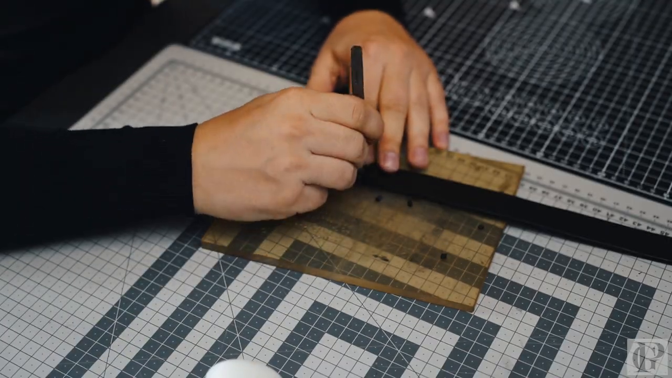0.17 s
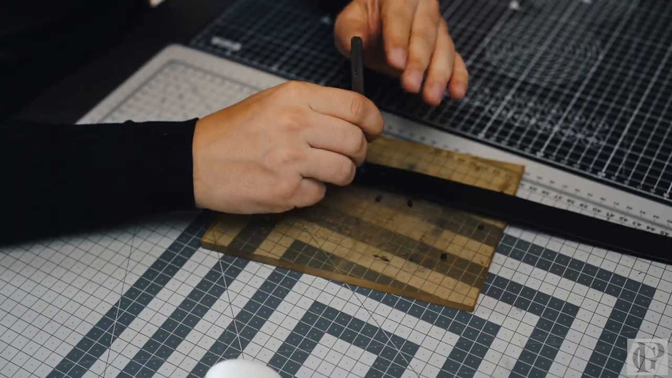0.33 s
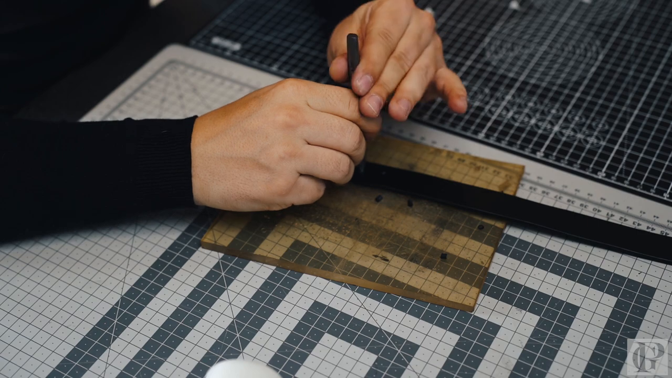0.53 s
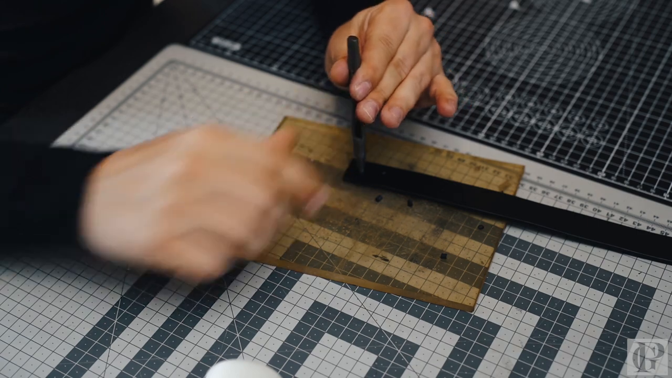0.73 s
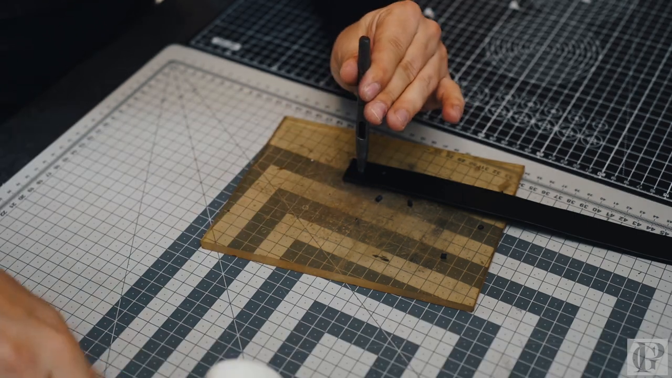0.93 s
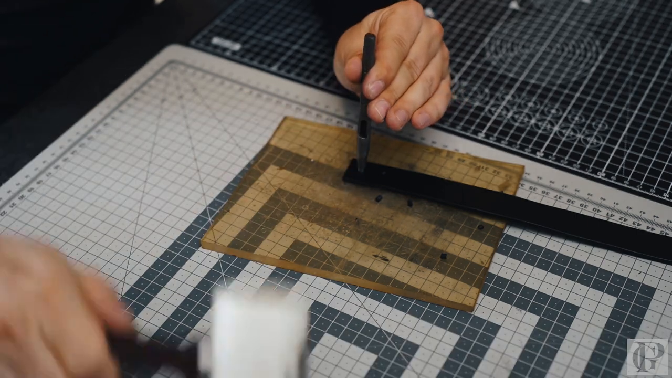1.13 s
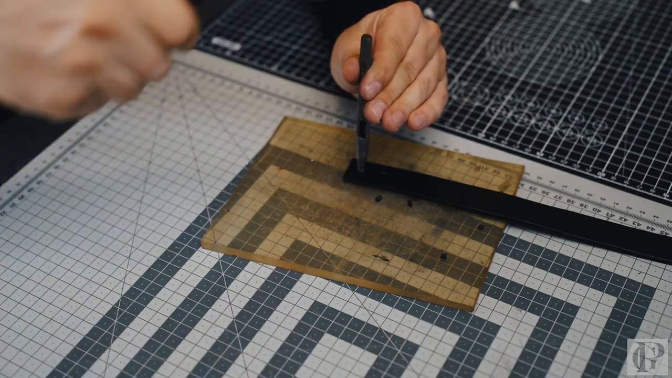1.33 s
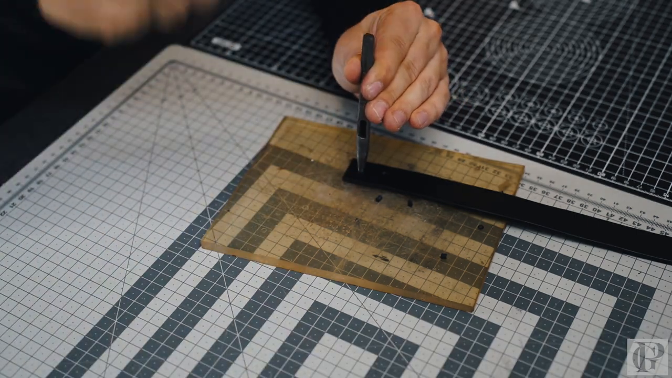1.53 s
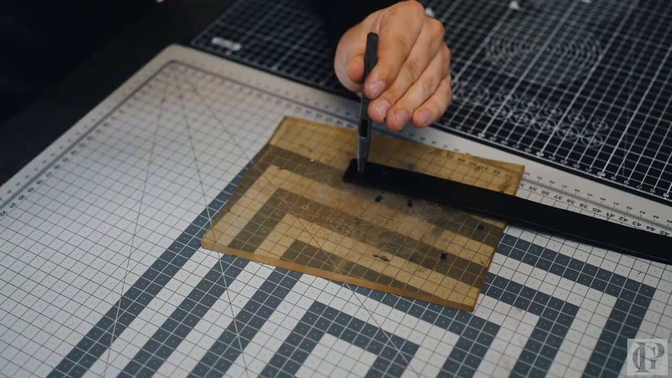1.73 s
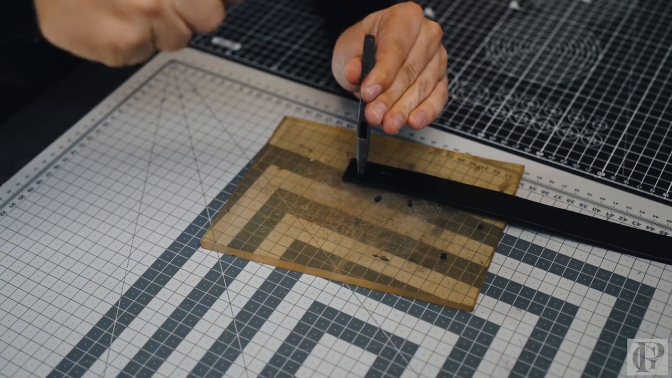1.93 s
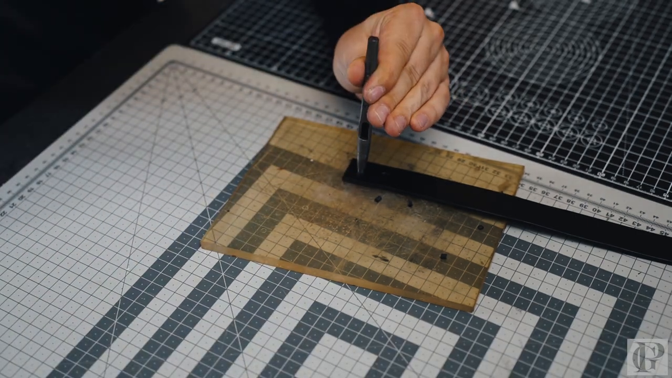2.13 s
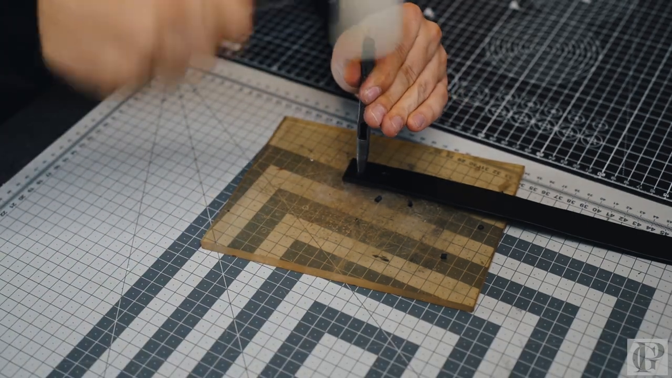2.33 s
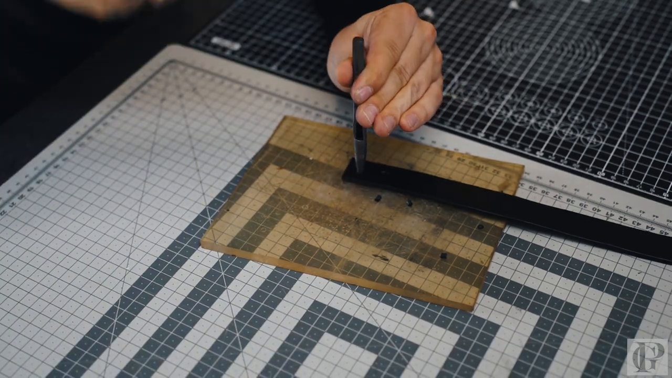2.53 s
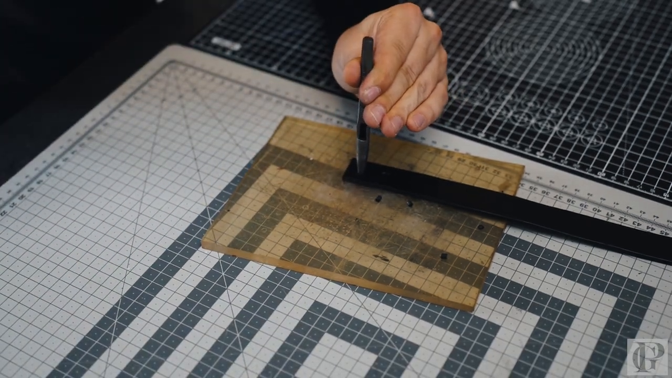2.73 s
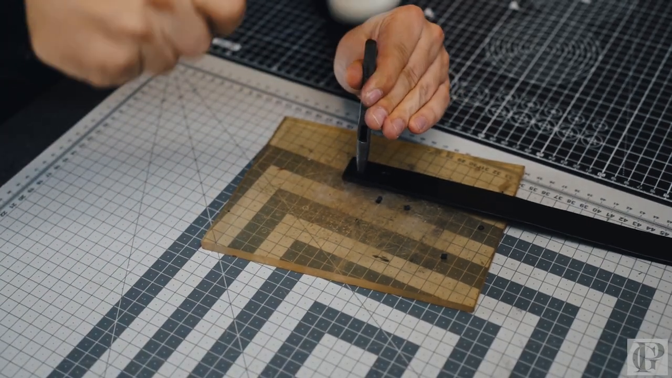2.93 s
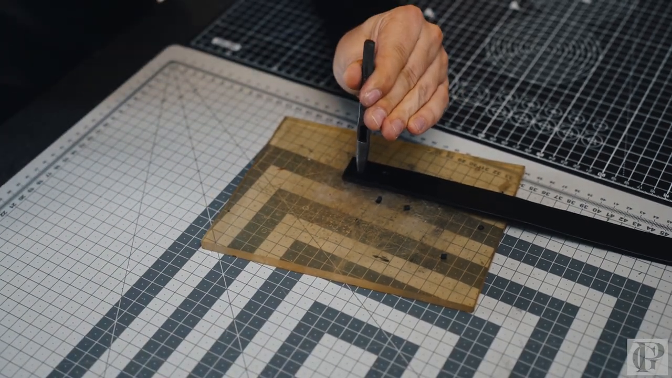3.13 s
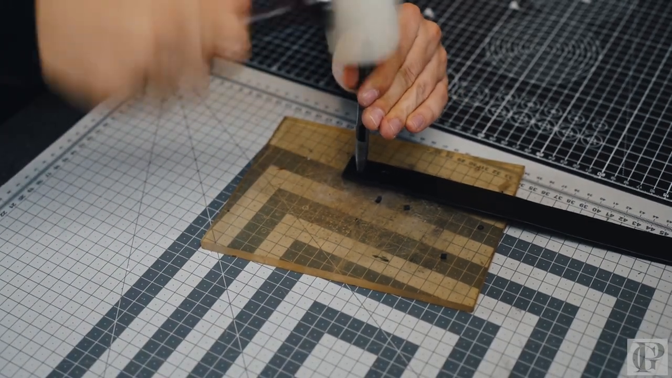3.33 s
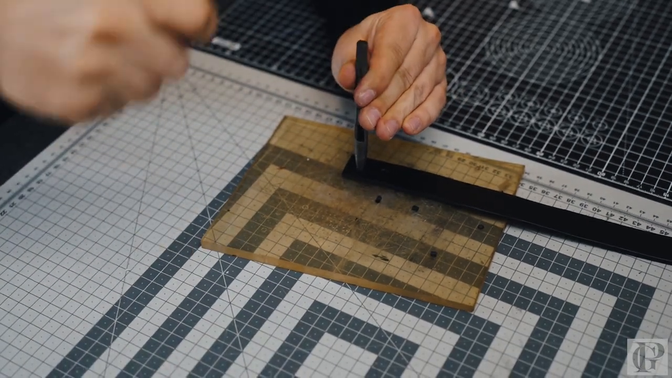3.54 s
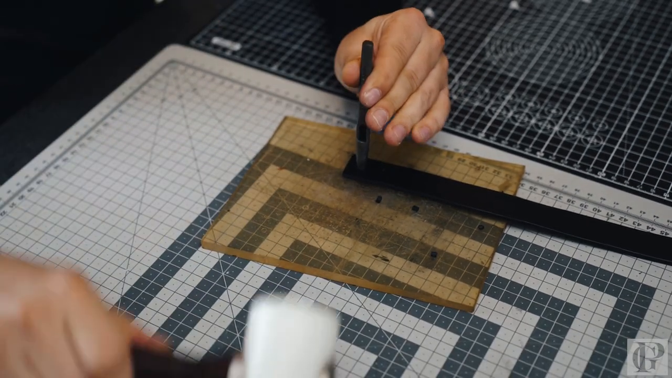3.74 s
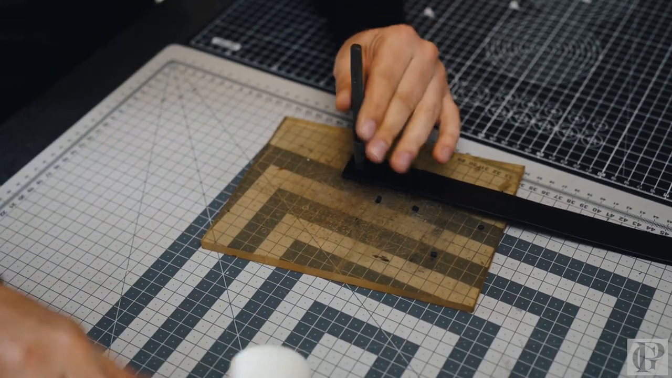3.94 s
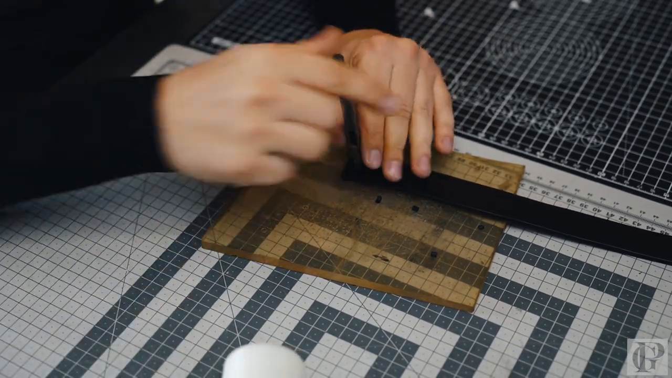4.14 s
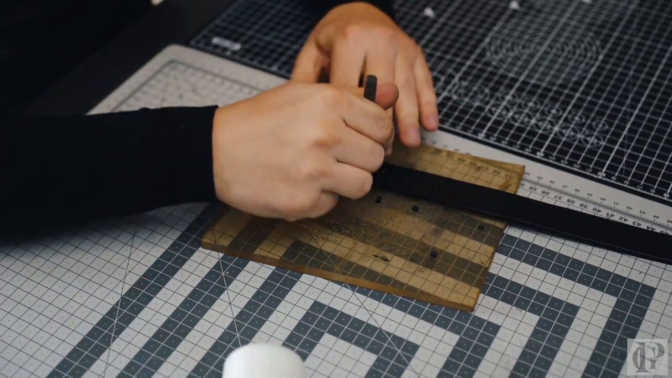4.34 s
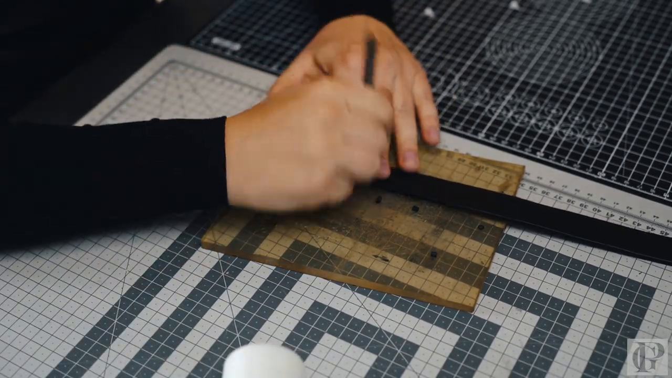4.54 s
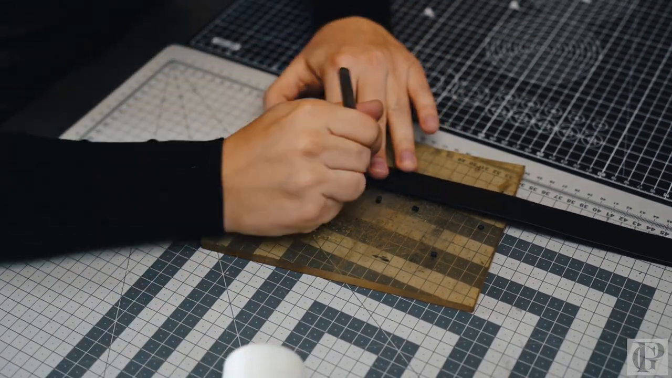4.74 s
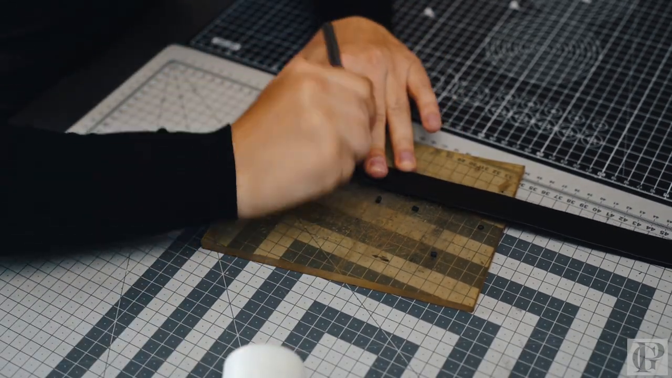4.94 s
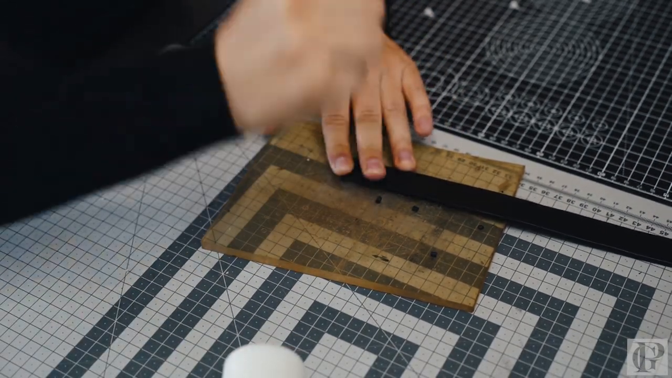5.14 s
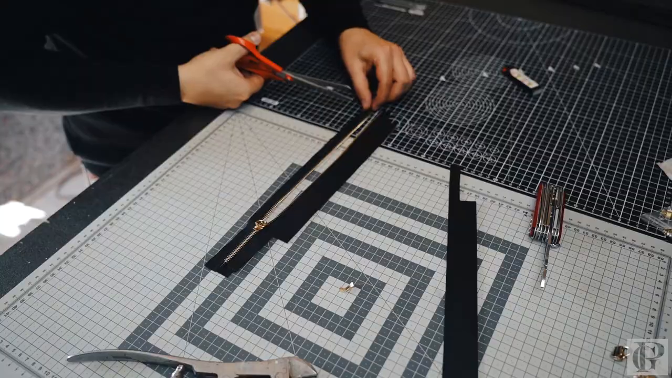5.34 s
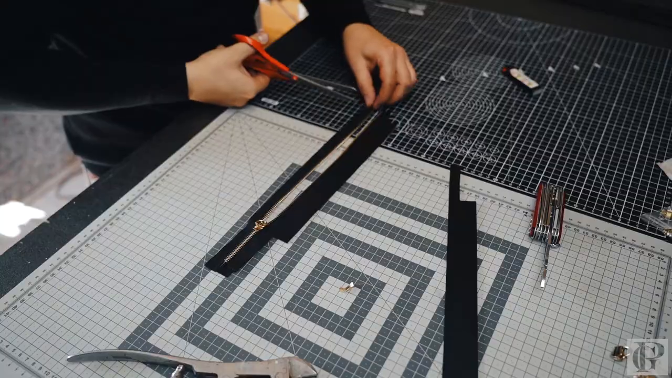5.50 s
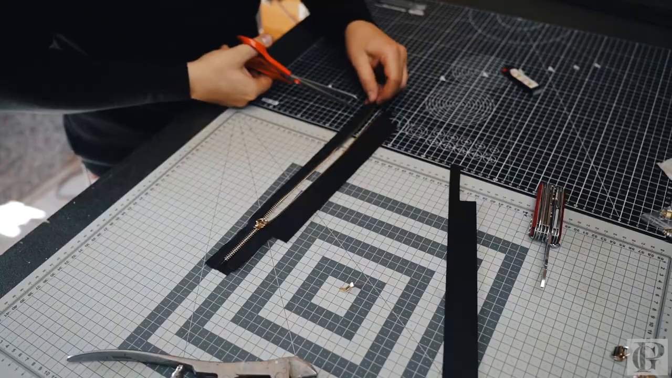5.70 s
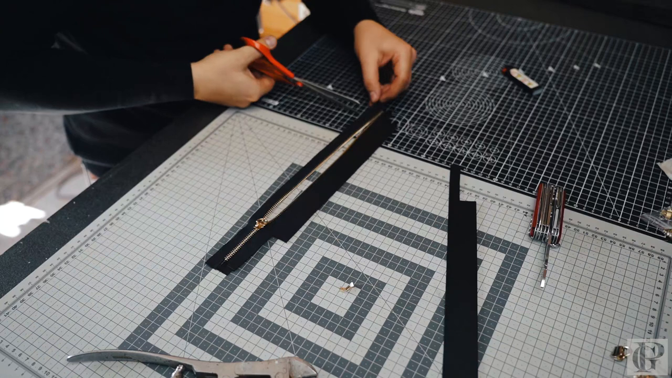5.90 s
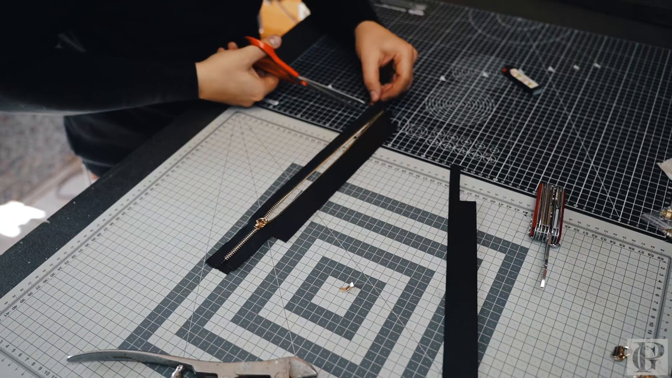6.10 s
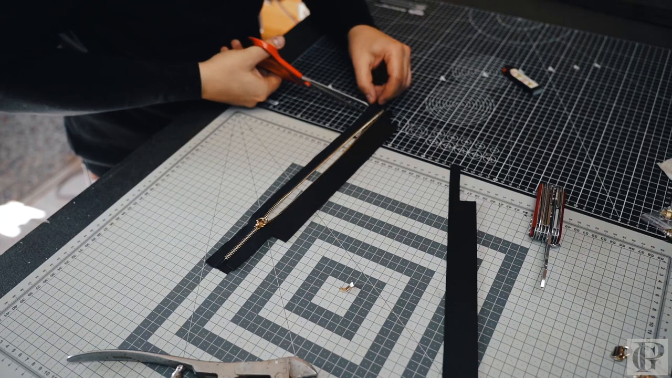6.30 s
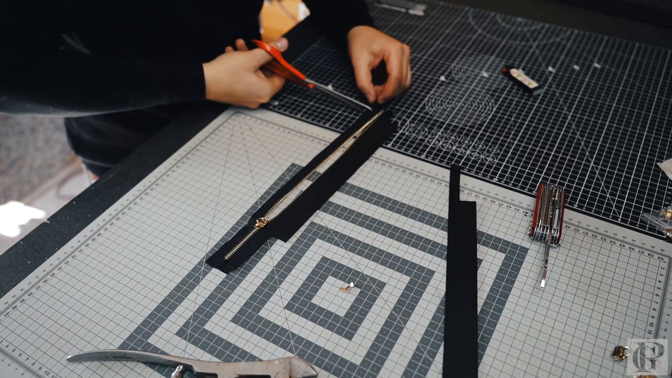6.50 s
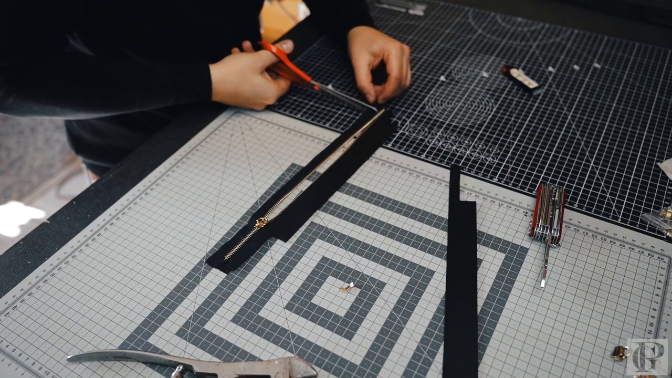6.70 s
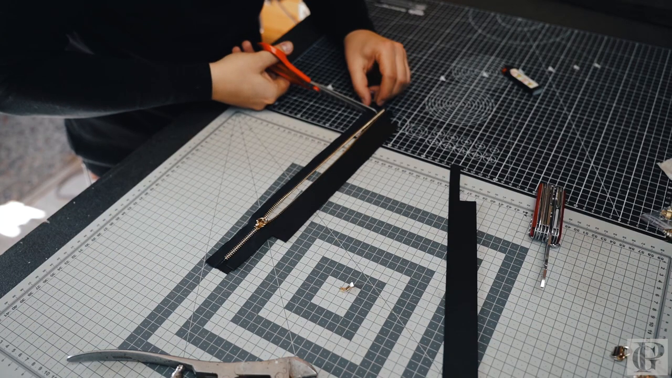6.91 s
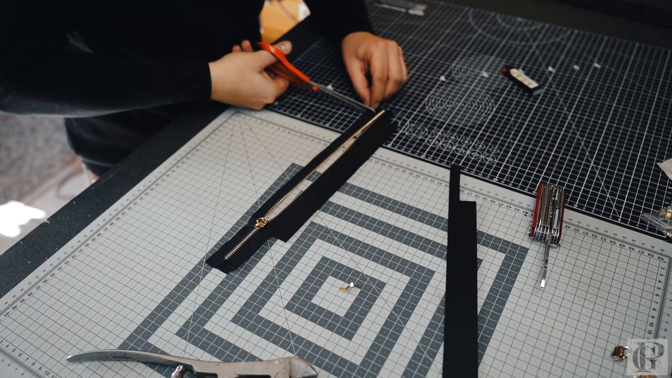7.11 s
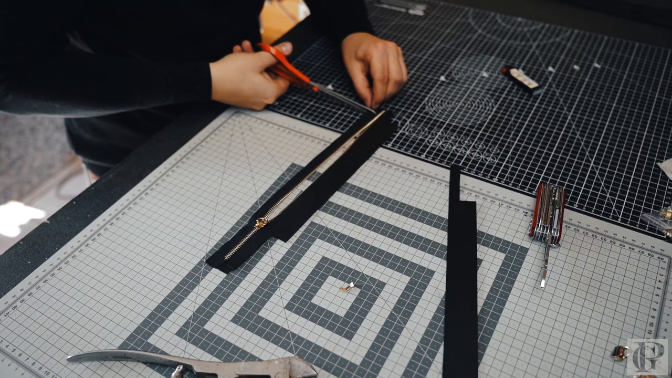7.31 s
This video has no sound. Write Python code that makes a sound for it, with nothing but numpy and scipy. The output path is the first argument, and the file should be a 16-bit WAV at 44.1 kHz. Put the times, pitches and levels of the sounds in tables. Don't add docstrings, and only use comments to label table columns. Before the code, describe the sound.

In a bare, hard-walled room with low ventilation hum, fingers and tools tick and rustle on a table. A plastic mallet hits a steel punch through leather into a board four times, half a second apart, each crack squashed so the room echo swells. The mallet clatters onto the mat, light handling follows, then an abrupt cut to a quieter hum with small scissor ticks.

```python
import sys
import numpy as np
from scipy import signal
from scipy.fft import rfft, irfft
from scipy.io import wavfile
from scipy.ndimage import uniform_filter1d, minimum_filter1d

SR = 44100
rng = np.random.default_rng(int(sys.argv[2]) if len(sys.argv) > 2 else 0)


def how_loud(loudness_db):
    steps = np.asarray(loudness_db, float) / 20
    return 10 ** steps


def store_pcm(level_fs):
    pcm = np.round(np.clip(level_fs, -1, 1) * 32767).astype(np.int16)
    wavfile.write(sys.argv[1], SR, np.atleast_2d(pcm).T)


N = 324540
CHANGE_S = 5.374

# f/Hz, level/dB, T60/s
TABLE_MODES = [(39, -24.5, 1), (60, -24, 0.39), (86, -8.5, 0.27), (114.8, -12, .3), (154.7, -1, .35),
               (178.9, -4.5, 0.19), (251, -5.5, 0.36), (389, -6, 0.37), (415.4, -0.5, .15)]
# f/Hz, density/dB per Hz
MAT_COLOUR = [(59, -46), (100, -10.5), (156, -11.5), (481, -3), (547, -1), (991, 2), (1200, 1.5),
              (1650, -2), (3940, -20.5), (10700, -36.5), (16000, -50.5)]


def read(points, hz):
    f, value = np.transpose(points)
    return np.interp(np.log(hz + 1), np.log(f + 1), value)


def evened(x):
    return x / np.sqrt(np.mean(x ** 2) + 1e-20)


def add(mix, s, sound):
    part = mix[round(s * SR):][:len(sound)]
    part += sound[:len(part)]


def paired(a, b, same):
    same = np.clip(same, -1, 1)[:, None]
    return np.array([a, same * a + np.sqrt(1 - same ** 2) * b])


def noise(gain, same_points, hop=256):
    frames = N // hop + 5
    hz = np.fft.rfftfreq(4 * hop, 1 / SR)
    a, b, c, d = rng.standard_normal((frames, len(hz), 4)).T
    z = paired(a + 1j * b, c + 1j * d, read(same_points, hz))
    z = z * gain(hz[:, None], np.arange(frames) * hop / SR)
    return signal.istft(z, nperseg=4 * hop, noverlap=3 * hop)[1][:, :N]


def ring(modes, tilt_db=0., detune=0., rise=.8, centre_hz=1000):
    hz, db, t60 = np.transpose(modes)[:, :, None]
    hz = hz * (1 + detune * rng.standard_normal(hz.shape))
    t = np.arange(int(np.max(t60) * SR) + 2) / SR
    side = (-1.) ** np.arange(len(hz))[:, None]
    decay = how_loud(db + tilt_db * np.log2(hz / centre_hz) - 60 * t / t60)
    build = 1 - np.exp(-t * hz / rise)
    return (side * decay * build * np.sin(2 * np.pi * hz * t)).sum(0)


def pulse(points, tilt_db):
    hz = abs(np.fft.fftfreq(4096, 1 / SR))
    db = read(points, hz) + tilt_db * np.log2((hz + 50) / 1000)
    log_gain = np.log(how_loud(np.maximum(db, -100)))
    click = np.fft.ifft(np.exp(np.conj(signal.hilbert(log_gain)))).real[:2048]
    return click / np.linalg.norm(click)


def scattered(click):
    longest_s = .0055
    wander = evened(uniform_filter1d(rng.standard_normal(2049), size=24))
    delay = longest_s * (.5 + .5 * np.tanh(wander))
    phase = -2j * np.pi * np.cumsum(delay) * SR / 4096
    return irfft(rfft(click, 4096) * np.exp(phase), 4096)


def room(x):
    # f/Hz, T60/s
    room_t60 = [(40, 0.52), (110, 0.24), (280, 0.36), (740, 0.46), (1940, .5), (5120, 0.46), (9000, 0.36),
                (15000, 0.24)]
    # f/Hz, likeness
    room_same = [(120, 1), (250, .985), (500, .8), (1000, .64), (2000, .45), (4000, .05), (16000, .05)]
    # f/Hz, share
    room_late = [(200, .45), (800, 0.52), (2200, .6), (5000, 0.8), (14000, 0.52)]
    taps = np.zeros((2, SR))
    at = np.arange(120, SR - 16, 16) + rng.integers(0, 16, (2, (SR - 121) // 16))
    np.put_along_axis(taps, at, rng.choice([-1., 1.], at.shape), 1)
    hz, t, z = signal.stft(taps, SR, nperseg=256)
    z = paired(*z, read(room_same, hz)) * how_loud(-60 * t / read(room_t60, hz)[:, None])
    z *= 1 - np.clip(read(room_late, hz), 0, .95)[:, None] / (1 + (t / 0.036) ** 4)
    tail = signal.istft(z, SR, nperseg=256)[1]
    tail[:, :100] = 0
    return signal.fftconvolve(x[None], tail / np.linalg.norm(tail[0]), axes=1)[:, :N]


def hum():
    # t/s, level/dB
    hum_level = [(0, -50), (0.552, -47.5), (1.011, -48), (1.85, -48), (4.399, -55.5), (5.0, -51),
                 (5.361, -50), (5.386, -62), (6.301, -59.5), (6.4, -58.5), (6.65, -59.5), (7.099, -61),
                 (7.36, -59)]
    # f/Hz, density/dB per Hz
    hum_near = [(15, -48.5), (25, -10.5), (48, -21.5), (102, 6), (139, -14.5), (171, -0.5), (215, -23),
                (264, 1.5), (318, 4), (522, -13.5), (790, -8.5), (1050, -14.5), (1190, -16.5), (1700, -24),
                (3500, -41), (4550, -82.5), (7700, -120)]
    # f/Hz, density/dB per Hz
    hum_far = [(25, -14), (50, -11.5), (80, -13), (135, -2.5), (190, -10), (250, 2), (310, -2), (400, -3),
               (600, -14.5), (800, -15), (1100, -21.5), (1400, -23), (2000, -31), (3500, -56)]
    # f/Hz, likeness
    hum_same = [(60, 1), (240, 0.93), (950, 0.78), (3770, 0.0058), (15000, 0.03)]
    # f/Hz, density/dB per Hz
    hiss_colour = [(1180, -32.5), (2000, 3.5), (4970, 1), (7010, -4), (7720, -0.5), (11500, -1),
                   (12500, -27), (16500, -20)]
    s, db = np.transpose(hum_level)

    def rumble(hz, t):
        patches = rng.standard_normal((len(t), len(hz))).T
        patches = evened(uniform_filter1d(uniform_filter1d(patches, 4, 0), 8, 1))
        colour = np.where(t < CHANGE_S, read(hum_near, hz), read(hum_far, hz))
        colour = how_loud(colour - 80 * (hz > 3600))
        return colour / np.sqrt((colour ** 2).sum(0)) * how_loud(np.interp(t, s, db) + 1.3 * patches)

    def hiss_gain(hz, t):
        return how_loud(read(hiss_colour, hz) - 60 * (hz < 1800)) + 0 * t

    low = noise(rumble, hum_same, hop=512) * how_loud(-7.0) * how_loud([[-1.01], [1.01]])
    hiss = evened(noise(hiss_gain, [(100, .3), (16000, .2)]))
    return low + how_loud(-82.5) * hiss


def rustles(near, far, after_change):
    # start/s, end/s, level/dB, centre f/Hz
    slides = [
        (0.272, 0.514, -78, 6000),
        (0.678, 0.753, -76, 4200),
        (0.981, 1.07, -67.5, 3500),
        (4.947, 4.985, -70, 5000),
        (5.715, 5.88, -83, 7300),
        (6.775, 6.827, -85.5, 5000),
    ]
    for start, end, db, hz in slides:
        if (start > CHANGE_S) == after_change:
            count = int((end - start) * SR)
            slips = rng.random(count) < 400 / SR
            slips = slips * how_loud(3.9 * np.minimum(rng.exponential(1, count), 3))
            band = signal.butter(1, [hz * 0.15, min(hz * 1.4, SR / 2.2)], "bandpass", fs=SR)
            rub = signal.lfilter(*band, rng.standard_normal(count) * (0.43 + slips))
            rub = how_loud(db) * evened(rub) * signal.windows.tukey(count, .4)
            add(near, start, rub)
            add(far, start, 0.5 * rub)


def ticks(near, far, after_change):
    # t/s, peak level/dB, f/Hz, width/octaves
    touches = [(0.2651, -69, 6100, 2.4), (.959, -66, 1200, 1.4), (.9738, -68, 3440, 1.1),
               (0.9987, -54.5, 3020, 1.3), (1.056, -38.5, 6700, 0.79), (1.0584, -40, 2750, 0.83),
               (1.2795, -58, 3533, 0.25), (1.352, -59.5, 4450, 2.4), (4.6457, -63, 8200, 2.3),
               (4.7206, -76, 3000, 0.92), (4.9368, -66, 5500, 1.74), (4.956, -60, 2100, 0.16),
               (5.065, -43.5, 5740, 0.42), (5.0673, -45, 1482, 7), (5.148, -62.5, 10700, 0.22),
               (5.362, -63, 5750, 1.4), (5.3725, -67.5, 4000, 2.4), (5.634, -72.5, 5980, 1.1),
               (5.82, -69, 3960, 1.5), (5.8437, -59.5, 6250, 1.6), (5.9198, -52.5, 2300, 1.24),
               (6.2503, -71, 4670, 1.3), (6.807, -68, 3000, 2.1), (7.1367, -65, 5230, 1.18),
               (7.256, -63.5, 7760, 1.7)]
    for s, db, hz, width in touches:
        if (s > CHANGE_S) == after_change:
            t60 = min(0.016 * how_loud(0.34 * (db + 65)) / width ** 0.35, .045)
            t = np.arange(int(t60 * SR)) / SR
            scrape = rng.standard_normal(len(t)) * how_loud(-60 * t / t60)
            scrape[0] += 1.1
            click = pulse([(hz / 4 ** width, -40), (hz / 2 ** width, -12), (hz, 0),
                           (hz * 2 ** width, -12), (hz * 4 ** width, -30)], 0)
            room_db = 17.5 + np.log2(hz / 4000) - width
            add(near, s, how_loud(db) * np.convolve(scrape, click[:700]))
            add(far, s, how_loud(db + room_db) * click)


def thuds(near, table, far, after_change):
    # t/s, level/dB, tilt/dB per octave, room level/dB
    bumps = [
        (0.701, -58, 2, 2),
        (1, -45, -2, 13.5),
        (1.057, -50, -3, 26.5),
        (4.957, -60, 5.5, 8),
        (5.0658, -43.5, -9, 21.5),
        (5.922, -57.5, -0.5, 23),
    ]
    for s, db, tilt_db, room_db in bumps:
        if (s > CHANGE_S) == after_change:
            add(table, s, how_loud(db) * ring(TABLE_MODES, tilt_db, 0.071, rise=.3, centre_hz=155.0))
            add(near, s, how_loud(db + 8 + 0.62 * room_db) * pulse(MAT_COLOUR, -5.5))
            add(far, s, how_loud(db + room_db) * pulse(MAT_COLOUR, -1.8))


def handling(after_change):
    near, table, far = np.zeros((3, N))
    ticks(near, far, after_change)
    thuds(near, table, far, after_change)
    rustles(near, far, after_change)
    return near * how_loud([[-.8], [.8]]) + table + room(far)


def strikes(rows, modes, steel, colour, drive_db, room_db):
    tool, table, far = np.zeros((3, N))
    for s, db, tilt_db, thump_db, knock_db, steel_db in rows:
        s = s + .0012
        size = how_loud(db + drive_db)
        knock = size * how_loud(knock_db)
        add(tool, s, knock * ring(modes, tilt_db + 0.41 * knock_db, 0.0085))
        add(tool, s, knock * how_loud(-2) * pulse(colour, tilt_db + 6.0))
        add(far, s, size * how_loud(room_db) * scattered(pulse(colour, tilt_db)))
        add(table, s, size * how_loud(thump_db - 18.0) * ring(TABLE_MODES, 0, 0.014, rise=2.0))
        steel_ring = size * how_loud(steel_db) * ring(steel, 0, 0.022)
        add(tool, s, steel_ring)
        add(far, s, steel_ring * how_loud(-0.3))
    return tool + table + room(far)


def mallet_landings():
    # t/s, head level/dB, handle level/dB, brightness/dB per octave, shank ring/dB
    rocks = [
        (3.9055, -19.5, -19.5, -2.5, -38.5),
        (3.9335, -28.5, -22, 0.5, -56.5),
        (3.9787, -9.5, -14.5, 2, -39),
        (4.008, -23, -21, 3.5, -47),
        (4.0408, -15, -38, 0.1, -18.5),
        (4.0889, -33, -20.5, 4.5, -41),
    ]
    # f/Hz, level/dB, T60/s
    mallet_modes = [(414, -11.5, 0.023), (613, -2, 0.014), (828, -5, 0.041), (1186, -9, .025),
                    (1565, -10.5, 0.011), (2000, -3, 0.013), (3245, -14, 0.0063), (5000, -23.5, 0.0059),
                    (8100, -32.5, 0.0035), (12500, -34.5, .003)]
    # f/Hz, level/dB, T60/s
    shank_modes = [(1120, -11.5, .012), (3370, 2.5, .013), (3340, 4.5, .015), (3700, -3.5, 0.01),
                   (4870, -9, .011)]
    contacts = []
    for s, head_db, handle_db, tilt_db, shank_db in rocks:
        contacts.append((s, head_db, tilt_db, shank_db))
        contacts.append((s + 0.0053, handle_db, tilt_db - 6, shank_db - 14))
    rows = []
    for s, db, tilt_db, shank_db in contacts:
        thump_db = -26 - db + .3 * (db + 19.5)
        rows.append((s, db, tilt_db, thump_db, 3, shank_db - db))
    return strikes(rows, mallet_modes, shank_modes, MAT_COLOUR, drive_db=6, room_db=15)


def punch_blows():
    # t/s, strength/dB, squareness/dB (0 = flat on the punch, below = glancing), steel ring/dB
    hits = [
        (1.8658, -15, -7, -24.5),
        (2.418, -14.5, -1.5, -33),
        (2.9202, -13, -0.76, -31.5),
        (3.4149, -13, -0.1, -5),
    ]
    # f/Hz, level/dB, T60/s
    punch_modes = [(312, 5, 0.014), (920, -17, 0.0023), (2130, 9, 0.0093), (4300, 0, 0.0055),
                   (6800, -21, 0.012), (8680, -1.5, 0.0016), (12280, -43.5, .003)]
    # f/Hz, level/dB, T60/s
    steel_modes = [(3170, 4, 0.0039), (6600, -21, .004)]
    # f/Hz, density/dB per Hz
    blow_colour = [(60, -39), (140, -9), (200, -4), (260, -2), (400, -4.5), (1000, -9), (2600, -10),
                   (3050, -23.5), (4480, -24), (5300, -29), (5930, -29), (9000, -41.5), (15500, -48),
                   (16300, -73.5)]
    rows = []
    for s, db, square_db, steel_db in hits:
        tilt_db = 0.28 - 0.04 * square_db
        rows.append((s, db, tilt_db, 0.5, -2.7 + square_db, steel_db))
    return strikes(rows, punch_modes, steel_modes, blow_colour, drive_db=19, room_db=17)


def scene():
    first = punch_blows() + mallet_landings() + handling(False)
    before = np.arange(N) < CHANGE_S * SR
    return np.where(before, first, handling(True)) + hum()


def limiter(x):
    peak_db = 20 * np.log10(-minimum_filter1d(-abs(x).max(0), size=29) + 1e-9)
    fall = np.arange(N) * 250. / SR
    held_db = np.maximum.accumulate(peak_db + fall) - fall
    over_db = np.maximum(held_db + 9.5, 0)
    return x / how_loud(.86 * uniform_filter1d(over_db, size=37))


def ports(x):
    # f/Hz, left minus right level/dB
    port_balance = [(120, 0.55), (500, -0.9), (2000, -1.14), (5000, -0.35), (12000, -2.1)]
    edge_hz, edge_width_hz = 16750, 700
    hz = np.fft.rfftfreq(512, 1 / SR)
    gains = how_loud(np.outer([.5, -.5], read(port_balance, hz)))
    gains = gains * np.clip((edge_hz - hz) / edge_width_hz, 0, 1) ** 2
    left, right = [signal.firwin2(127, hz, gain, window="blackman", fs=SR) for gain in gains]
    taps = np.array([left, np.roll(right, 1)])
    return signal.oaconvolve(x, taps, "same", axes=1)


def band_limit(x):
    return signal.sosfilt(signal.butter(12, 16810, fs=SR, output="sos"), x)


def record(dry):
    return band_limit(ports(limiter(dry)))


dry = scene()
out = record(dry)
store_pcm(out)
```